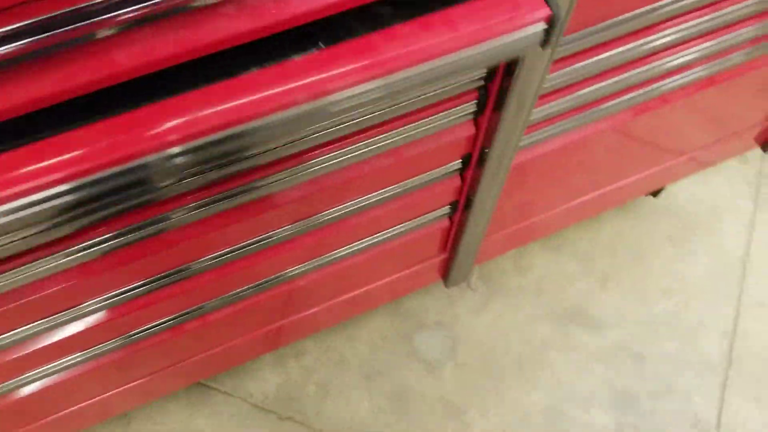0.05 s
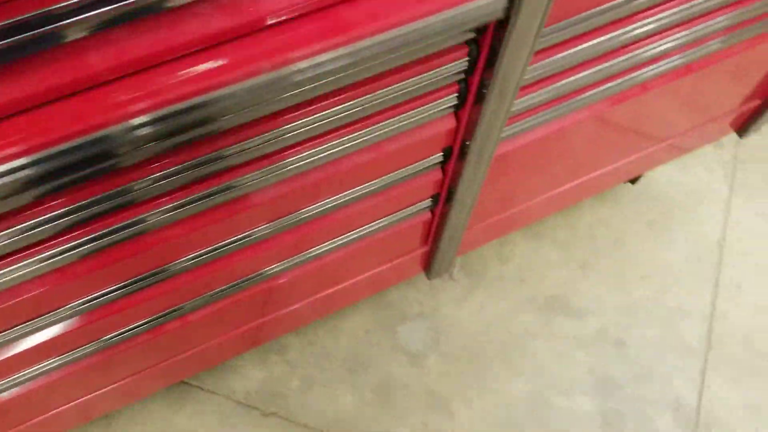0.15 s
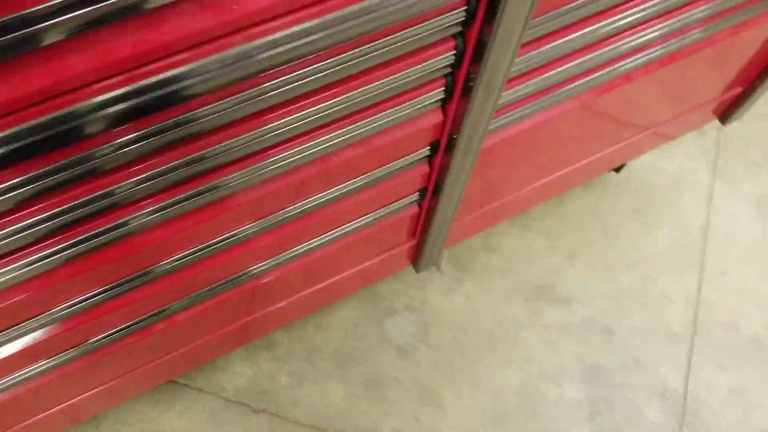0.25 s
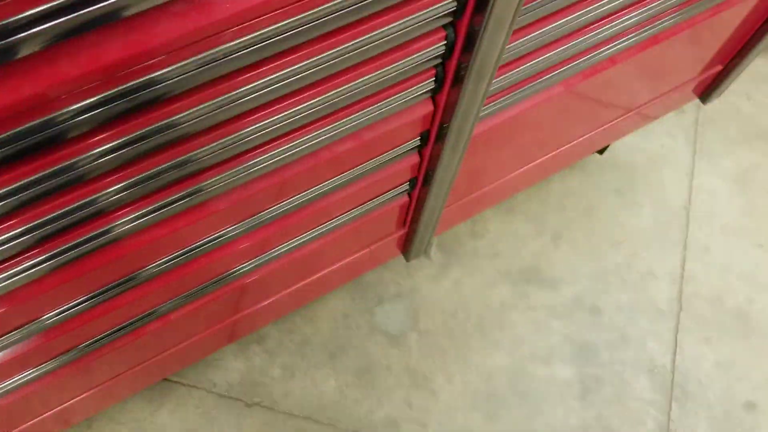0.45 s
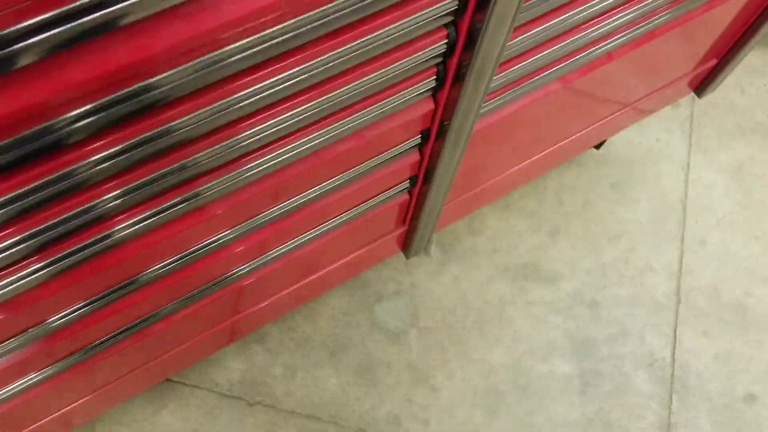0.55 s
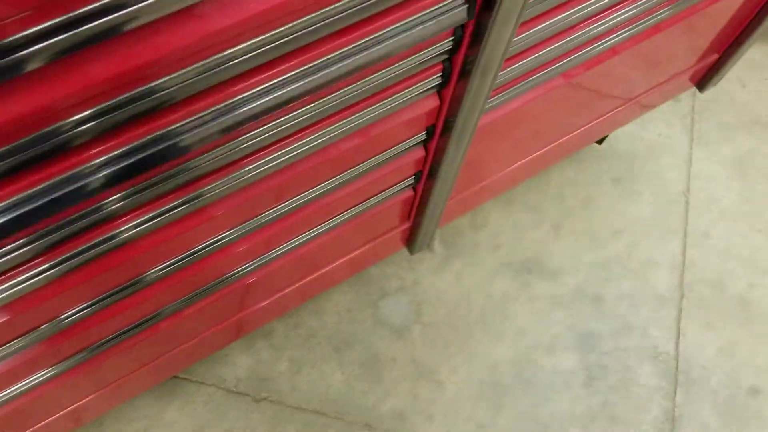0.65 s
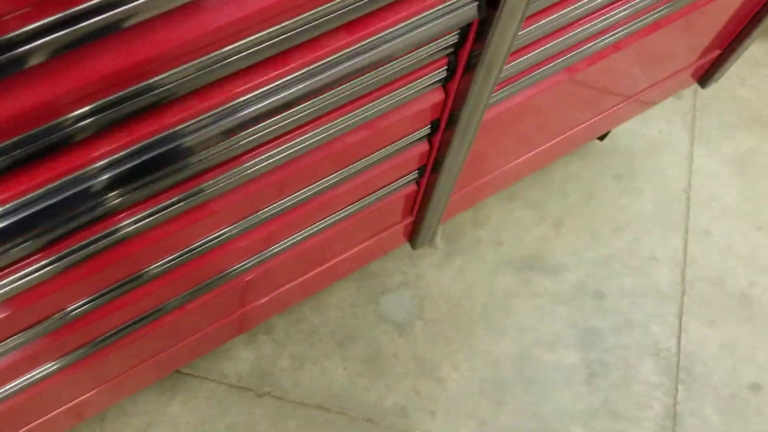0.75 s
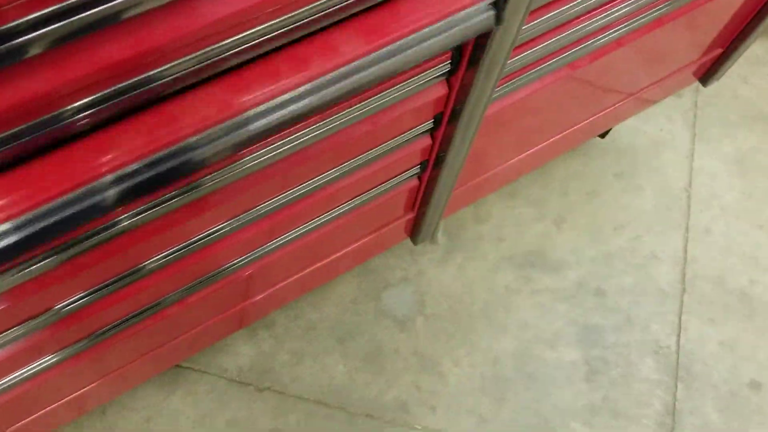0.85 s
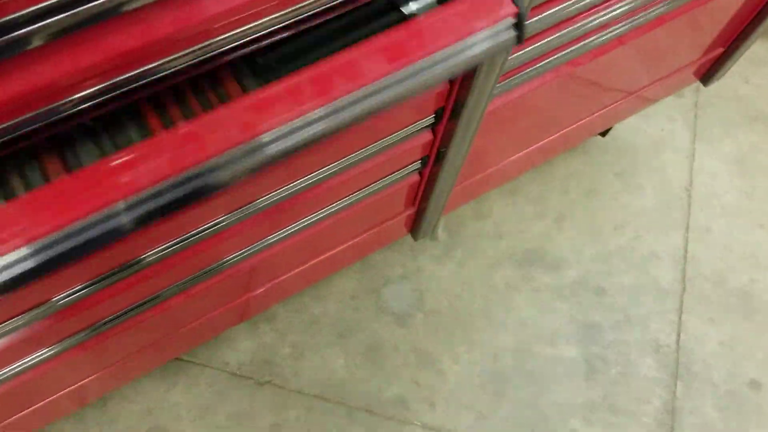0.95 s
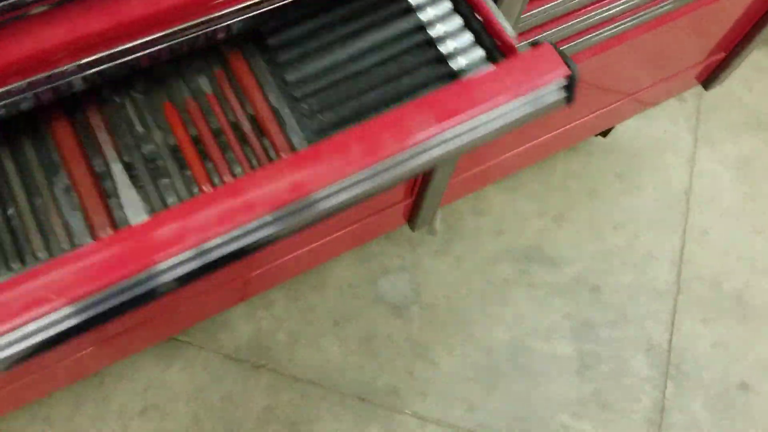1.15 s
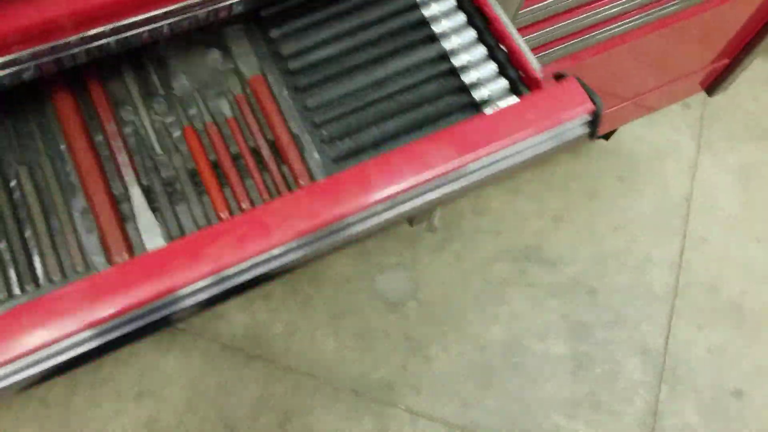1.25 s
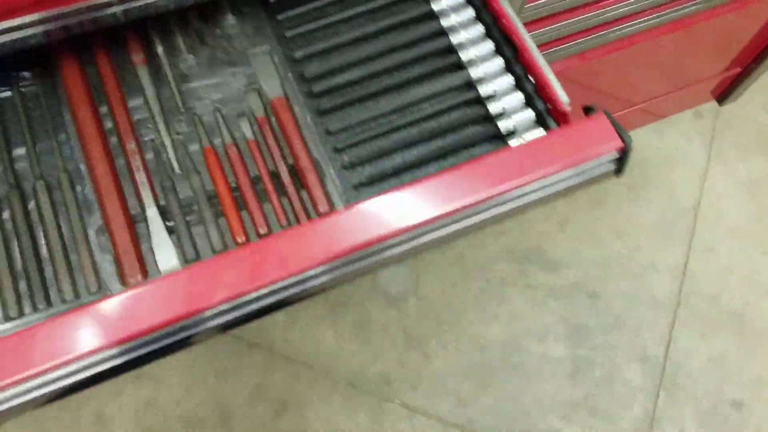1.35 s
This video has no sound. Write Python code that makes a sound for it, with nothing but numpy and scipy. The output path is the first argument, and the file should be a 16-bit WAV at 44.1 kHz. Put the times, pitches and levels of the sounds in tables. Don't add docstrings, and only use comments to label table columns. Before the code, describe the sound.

A steel tool chest drawer rumbles briefly on ball slides and slams shut with a bright rattling crash and low cabinet boom; the workshop echoes, then a latch clicks and the next drawer rolls quietly out, close phone microphone.

```python
import sys
import numpy as np
from scipy import signal
from scipy.fft import rfft, irfft, next_fast_len
from scipy.io import wavfile
from scipy.ndimage import uniform_filter1d

SR = 44100
rng = np.random.default_rng(int(sys.argv[2]) if len(sys.argv) > 2 else 0)


def voltage_ratio(decibels):
    exponent = np.asarray(decibels, float) / 20
    return 10 ** exponent


def waveform_to_disk(signal):
    frames = np.transpose(np.atleast_2d(signal))
    scaled = np.clip(frames, -1, 1) * 32767
    samples = np.round(scaled).astype(np.int16)
    wavfile.write(sys.argv[1], SR, samples)


N = 61739
SIZE = 2 * next_fast_len(N - N // 4)
FREQ = np.fft.rfftfreq(SIZE, 1 / SR) + 1e-3

# freq_hz, likeness_0_to_1
PORT_LIKENESS = [(60, .98), (130, .95), (290, .87), (640, .4), (1400, 0), (15000, 0)]


def curve(table, hz):
    table = np.array(table, float)
    return np.interp(np.log(hz), np.log(table[:, 0] + 1e-9), table[:, -1])


def colour(x, gain):
    return irfft(rfft(x, SIZE) * gain, SIZE)[..., :N]


def fade(t_s, t60_s):
    return np.exp(-np.log(1000) * t_s / t60_s)


def ring(hz, t60_s, seconds):
    t_s = np.arange(int(seconds * SR)) / SR
    return np.sin(2 * np.pi * np.outer(hz, t_s)) * fade(t_s, np.reshape(t60_s, (-1, 1)))


def add(out, x, at_s):
    i = int(at_s * SR)
    out[:, i:i + x.shape[1]] += x[:, :N - i]


def noise_pair():
    alike = np.clip(curve(PORT_LIKENESS, FREQ), 0, 1)
    gains = np.sqrt([(1 + alike) / 2, (1 - alike) / 2])
    mid, side = colour(rng.standard_normal((2, N)), gains)
    return np.array([mid + side, mid - side])


def walk(rate_hz):
    k = int(SR / rate_hz)
    steps = np.repeat(rng.standard_normal(N // k + 1), k)
    return 0.59 * uniform_filter1d(uniform_filter1d(steps, k), k)[:N]


def octaves():
    for hz in 30 * 2. ** np.arange(10):
        yield hz, np.cos(np.pi / 2 * np.clip(np.log2(FREQ / hz), -1, 1)) ** 2


def flickering_noise(table, carrier):
    flicker_db = 1
    out = 0
    for _, shape in octaves():
        band = colour(carrier, shape * voltage_ratio(curve(table, FREQ)))
        out = out + voltage_ratio(flicker_db * walk(22)) * band
    return out / np.std(out)


def air():
    # freq_hz, level_db
    air_colour = [(18, -25.5), (30, -6), (145, -3.5), (303, 5.5), (889, -26), (2060, -9), (7470, -35.5),
                  (8980, -42.5), (16000, -27.5)]
    return voltage_ratio(-55.5) * flickering_noise(air_colour, noise_pair())


def slides():
    # time_s, level_db
    roll_level = [(0, -43), (.05, -47.5), (.12, -49.5), (0.209, -49.5), (.3, -41), (0.751, -49.5),
                  (.95, -54), (1.1, -57), (1.25, -56), (1.33, -56.5), (1.4, -60.5)]
    # freq_hz, level_db
    roll_colour = [(18, -24.5), (30, -2), (127, -3.5), (449, -4.5), (499, -6.5), (540, -8), (913, -11.5),
                   (2060, -22.5), (16000, -44.5)]
    # freq_hz, level_db
    hiss_colour = [(1500, -30), (4000, -10), (7300, 3.5), (8200, -4), (9000, -19), (12500, -5.5),
                   (16000, -1.5)]
    balls_per_s, ball_spread_db = 1000, 2
    hiss_db, hiss_idle, fastest_s, pull_s = -70, 0.67, 1.24, .11

    t_s = np.arange(N) / SR
    bumps = np.minimum(rng.exponential(size=N), 3)
    grain = voltage_ratio(ball_spread_db * np.repeat(bumps, 1 + int(SR / balls_per_s))[:N])
    level = np.array(roll_level, float)
    rumble = flickering_noise(roll_colour, noise_pair() * grain)
    rumble = rumble * voltage_ratio(np.interp(t_s, level[:, 0], level[:, 1]))
    pull = hiss_idle + np.exp(-((t_s - fastest_s) / pull_s) ** 2 / 2)
    return rumble + flickering_noise(hiss_colour, noise_pair()) * voltage_ratio(hiss_db) * pull


def tools():
    # start_s, pitch_hz, level_db, t60_s
    tool_rings = [
        (.718, 5150, -50, .09),
        (.993, 4350, -56, .06),
        (.993, 5150, -55, .06),
        (1.045, 4150, -59, .07),
        (1.105, 4200, -61, .08),
        (.81, 6400, -65, .3),
        (.005, 6300, -63, .2),
        (1.315, 780, -56, .15),
    ]
    out = np.zeros((2, N))
    for at_s, hz, db, t60_s in tool_rings:
        cluster = ring(hz * (1 + .015 * rng.standard_normal(8)), np.full(8, t60_s), .3)
        onset = np.clip(np.arange(cluster.shape[1]) / 300, 0, 1)
        add(out, voltage_ratio(db - 3) * cluster.reshape(2, 4, -1).sum(axis=1) * onset, at_s)
    return out


def latch_snaps():
    # start_s, pitch_hz, level_db
    snap_rings = [(0.0506, 1697, -43.5), (.0513, 2130, -51), (0.0504, 2670, -45), (0.0504, 3020, -41),
                  (.0513, 5200, -51), (0.0504, 7410, -48.5), (.6023, 1890, -31.5), (.6023, 2250, -29),
                  (.6023, 2860, -28), (.6023, 3470, -32.5), (0.602, 4460, -35), (0.6027, 6740, -45),
                  (0.6014, 8440, -43.5)]
    out = np.zeros((2, N))
    for at_s, hz, db in snap_rings:
        add(out, voltage_ratio(db) * ring([hz, hz], [0.041] * 2, .06), at_s)
    return out


def contact_ticks(contact_ms, t_s, rise_s):
    noise, chance = rng.standard_normal((2, len(t_s)))
    flurry = noise * (np.abs(chance) > 1.6)
    ticks = flurry * fade(t_s, max(contact_ms, .3) * 0.0037) * np.clip(t_s / rise_s, 0, 1)
    ticks[int(rise_s * SR)] = 3.8
    return ticks / np.sqrt(np.sum(ticks ** 2))


def sheet_modes(hz):
    return ring(hz, 0.038 * (hz / 2000) ** -0.093, .06)


def port_likeness(hz):
    least_shared = 0.38
    return np.clip(np.maximum(least_shared, curve(PORT_LIKENESS, hz)), 0, 1)


def port_blend(rows, alike):
    return np.sqrt(alike) * rows[0] + np.sqrt(1 - alike) * rows[1:]


def part_voice(hz, tilt_db, part_hz):
    focus_db, focus_octaves = 5.5, 0.22
    hump = np.exp(-(np.log2(hz / part_hz) / focus_octaves) ** 2 / 2)
    return voltage_ratio(tilt_db * np.log2(hz / 3000) + focus_db * hump)


def steel_contacts(hits, tone, ring_db, crack_t60_s, steel_db):
    # freq_hz, spread_hz (blow to blow), level_db
    strong_modes = [(1820, 92, 1.5), (2082, 110, -0.5), (2650, 75, -7), (3114, 94, 4), (3423, 42, -5.5),
                    (3790, 86, -8.5), (4558, 150, -1), (5205, 84, -0.5), (6735, 47, -6), (7310, 100, -2),
                    (7850, 51, -10.5), (8450, 160, -25), (10550, 150, -6), (11600, 230, -14)]
    dense_db, crack_db, rise_s = -22.5, 7.5, .0012

    steel, out = np.array(strong_modes, float), np.zeros((2, N))
    dense_hz = np.sort(rng.uniform(300, 16000, 360))
    hz = np.r_[dense_hz, steel[:, 0]]
    mode_gain = voltage_ratio(np.r_[curve(tone, dense_hz) + dense_db, steel[:, 2] + steel_db])
    dense = sheet_modes(dense_hz)
    t_s = np.arange(dense.shape[1]) / SR
    f_hz = np.fft.rfftfreq(len(t_s), 1 / SR) + 1
    for at_s, db, tilt_db, contact_ms, part_hz in hits:
        strong_hz = steel[:, 0] + steel[:, 1] * rng.standard_normal(len(steel))
        bank = np.r_[dense, sheet_modes(strong_hz)]
        ticks = contact_ticks(contact_ms, t_s, rise_s)

        gains = port_blend(rng.standard_normal((3, len(hz))), port_likeness(hz))
        mix = gains * mode_gain * part_voice(hz, tilt_db, part_hz)
        ringing = signal.fftconvolve(mix @ bank, ticks[None])

        power = signal.fftconvolve(ticks ** 2, fade(t_s, crack_t60_s) ** 2)[:len(t_s)]
        shape = voltage_ratio(curve(tone, f_hz)) * part_voice(f_hz, tilt_db, part_hz) / (1 + (300 / f_hz) ** 4)
        noise = port_blend(rfft(rng.standard_normal((3, len(t_s)))), port_likeness(f_hz))
        crack = irfft(noise * shape, len(t_s)) * np.sqrt(np.abs(power))

        add(out, voltage_ratio(db + ring_db) * ringing, at_s - rise_s)
        add(out, voltage_ratio(db + crack_db) * crack, at_s - rise_s)
    return out


def small_clicks():
    # start_s, peak_db, tilt_db_per_octave, contact_ms, pitch_hz
    clicks = [(.0512, -37, 0, 6.3, 2840), (.060, -44, -8, 25, 3350), (.0725, -46, 3, 16, 7600),
              (.459, -41, 2, 12, 9000), (.5955, -34, 8, 16, 5500), (.6026, -27, -0.5, 1.9, 2430),
              (.606, -26.5, -9.5, 3.4, 2900), (.6435, -49, 7.5, 5.7, 9000), (.657, -48, -6, 13, 5000),
              (.70, -41.5, 3, 25, 5000), (.8165, -40.5, 0, 26, 7100), (.835, -46.5, 1, 37, 11500),
              (.897, -51, 2.5, 18, 13100), (.9625, -58, 0, 8.3, 12100), (.9935, -45.5, 1.5, 16, 12600),
              (1.105, -53.5, -2, 11, 4200), (1.325, -50, -5.5, 12, 1700)]
    # freq_hz, level_db
    click_colour = [(900, -34.5), (1450, -7), (1800, -0.5), (3300, -3.5), (4600, -11), (6000, -17.5),
                    (7600, -15), (16000, -22)]
    return steel_contacts(clicks, click_colour, ring_db=-7, crack_t60_s=0.033, steel_db=-29)


def clatter():
    # start_s, peak_db, tilt_db_per_octave, contact_ms, pitch_hz
    hits = [(.2172, -23, -6.5, 5.5, 1410), (.2187, -12.5, -4, 3.4, 2190), (.2203, -11, 1.5, 4.2, 3200),
            (.2256, -10.5, -2, 1.2, 1760), (.2272, -5.5, 2, 3, 3560), (.2336, -9, -0.5, 12, 2180),
            (.2356, -9, -0.5, 5, 4300), (.2404, -15.5, -2.5, 1.8, 7400), (.2482, -13, -3.5, 2.8, 1740),
            (.2568, -6, 2.5, 1.6, 3150), (.2598, -13, 3.5, 3.7, 8600), (.2678, -13, -2.5, 7.7, 1850),
            (.2725, -12, -0.5, 6.4, 2100), (.2798, -9, 2, 1.3, 2560), (.284, -16, 8, 2.4, 4530),
            (.2876, -9, 1, 3, 2300), (.2916, -7, 1, 1.6, 1760), (.2972, -11, 3.5, 1.4, 2090),
            (.2994, -6, 0.5, 2, 3180), (.3018, -7.5, -2, 2.7, 1970), (.3088, -12.5, 2.5, 3.4, 4000),
            (.3118, -14.5, 4.5, 3, 3000), (.3154, -16, -3.5, 2.2, 2010), (.3205, -21, -0.5, 3.6, 2500),
            (.3244, -28.5, -14.5, 4.5, 2070), (.3461, -17.5, -4, 4, 2440)]
    # freq_hz, level_db
    sheet_colour = [(300, -20), (550, -9.5), (1150, -8), (1450, -2.5), (2200, -3.5), (3400, -6),
                    (5500, -14.5), (16000, -23.5)]
    return steel_contacts(hits, sheet_colour, ring_db=0, crack_t60_s=0.017, steel_db=-18.5)


def cabinet():
    # start_s, level_db, push_ms
    thuds = [(0.219, -29, 1.4), (0.261, -18.5, 3.2), (0.2962, -6, 2.9), (.305, -6.5, 2.21),
             (.312, -6.5, 2.2), (.321, -4.5, 1.8), (.3245, -8.5, 2.46), (.345, -16.5, 2.6),
             (.362, -16, 3.4), (0.643, -27, 2.7), (.72, -30, 1.54), (1.323, -50, 0.68)]
    # freq_hz, level_db, t60_s
    wall_modes = [(78.5, -6, 0.104), (99.5, -7.5, .25), (132, -7.5, 0.15), (156, -4.5, 0.1),
                  (179.3, -3, 0.11), (208.5, -8, 0.23), (227, -9, 0.1), (262.5, -9, 0.42),
                  (304.3, -12.5, 0.25), (409, 3, 0.14), (474, -9.5, .25), (567, -16.5, 0.194),
                  (692, -8.5, 0.12)]
    # freq_hz, level_db, t60_s
    sway_modes = [
        (40, -37.5, 0.69),
        (53.7, -28.5, 1.28),
        (69, -33, 0.9),
    ]
    wall_db, push_db, detune, scatter, sway_start_s = -19, -11, .012, .25, .296

    walls, sway, out = np.array(wall_modes, float), np.array(sway_modes, float), np.zeros((2, N))
    for at_s, db, push_ms in thuds:
        push = np.hanning(int(push_ms * SR / 1000) + 3)
        wall_hz = walls[:, 0] * (1 + detune * rng.standard_normal(len(walls)))
        gains = voltage_ratio(walls[:, 1] + wall_db) * (1 + scatter * rng.standard_normal(len(walls)))
        boom = np.convolve(gains @ ring(wall_hz, walls[:, 2], .5), push / push.sum())
        boom[:len(push) - 1] -= voltage_ratio(push_db) * push[1:]
        add(out, voltage_ratio(db) * np.array([boom, boom]), at_s)
    swaying = voltage_ratio(sway[:, 1]) @ ring(sway[:, 0], sway[:, 2], 1.2)
    add(out, np.ones((2, 1)) * swaying, sway_start_s)
    return out


def room(x):
    # freq_hz, t60_s
    late_t60 = [(50, 2.37), (120, 1.74), (300, 1.03), (900, 1.064), (2500, 1.135), (6000, 0.75),
                (14000, 0.48)]
    # freq_hz, level_db
    room_colour = [(50, -18), (120, -13), (300, -10), (900, -10.5), (2500, -10.5), (6000, -9.5),
                   (14000, -11.5)]
    early_t60_s, early_db, gap_s, room_db = 0.24, -0.5, 0.009, -31.5

    t_s, noise, tail = np.arange(N) / SR, noise_pair(), 0
    for hz, shape in octaves():
        decay = fade(t_s, curve(late_t60, hz)) + voltage_ratio(early_db) * fade(t_s, early_t60_s)
        tail = tail + colour(noise, shape * voltage_ratio(curve(room_colour, FREQ))) * decay
    tail = tail * np.clip(t_s / gap_s, 0, 1) * voltage_ratio(room_db)
    return colour(tail, rfft(x.mean(axis=0), SIZE))


def scene():
    left_lag_s, click_wet_db = -0.000515, -1.5
    ticks = tools() + small_clicks()
    crash = clatter()
    boom = cabinet()
    lag = np.exp(-2j * np.pi * FREQ * left_lag_s / 2 * np.array([[1], [-1]]))
    wet = room(crash + voltage_ratio(click_wet_db) * ticks + boom)
    return colour(crash + ticks, lag) + latch_snaps() + boom + wet + slides() + air()


def low_pass(x):
    return signal.sosfilt(signal.butter(12, 16610, fs=SR, output="sos"), x)


def record(dry):
    # freq_hz, left_minus_right_db
    port_balance = [(60, 1), (110, 1), (200, 1.5), (380, 0.5), (700, 2), (1290, -0.5), (2380, 1),
                    (4400, 10.5), (8120, 5.5), (15000, 1.5)]
    low_hz, top_hz, ceiling = 32, 15750, .95
    lean = voltage_ratio(curve(port_balance, FREQ) / 2)
    x = colour(dry, np.array([lean, 1 / lean]))
    x = signal.sosfilt(signal.butter(2, low_hz, "high", fs=SR, output="sos"), x)
    x = ceiling * np.tanh(x / ceiling)
    x = signal.sosfilt(signal.ellip(12, .2, 60, top_hz, fs=SR, output="sos"), x)
    return low_pass(x)


dry = scene()
out = record(dry)
waveform_to_disk(out)
```